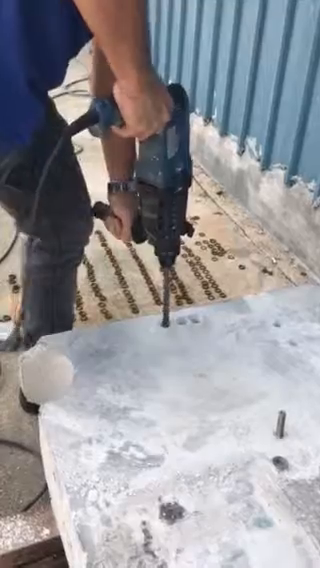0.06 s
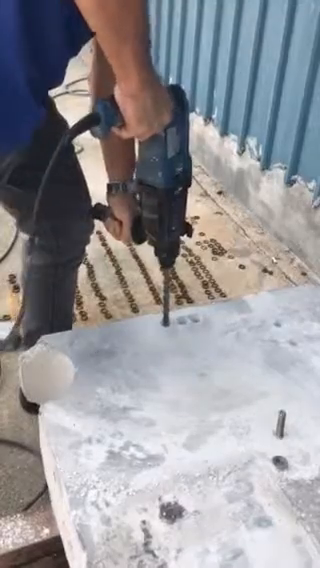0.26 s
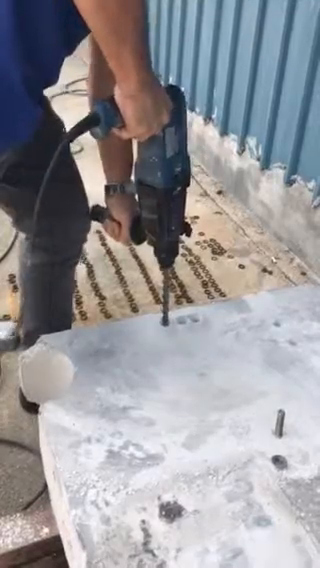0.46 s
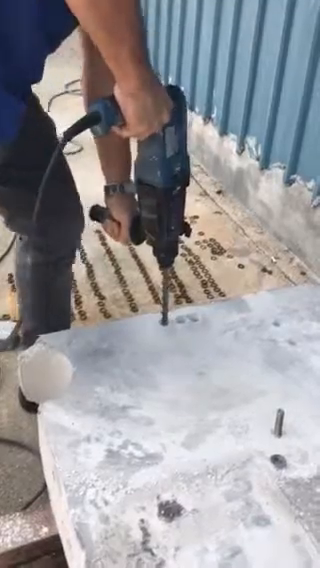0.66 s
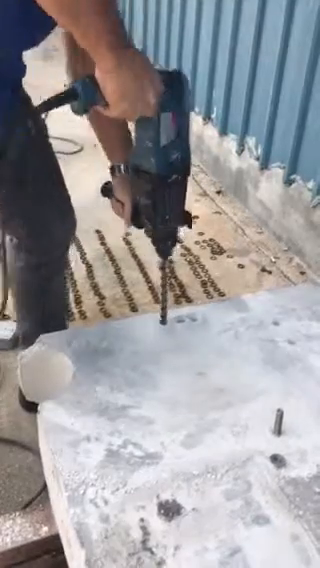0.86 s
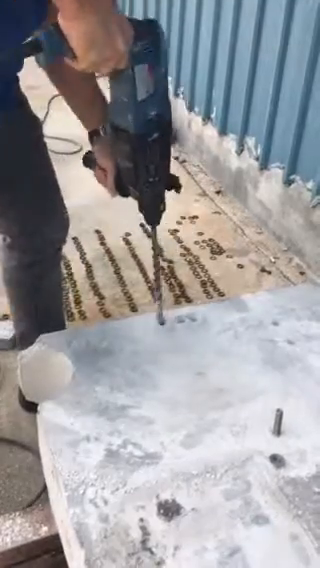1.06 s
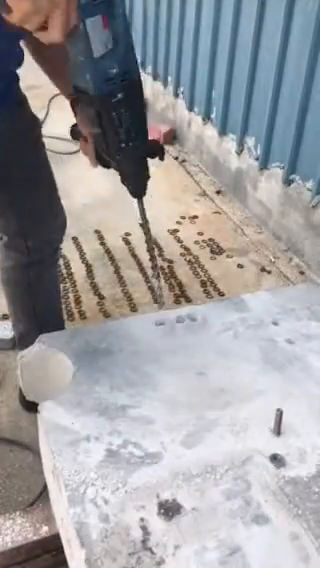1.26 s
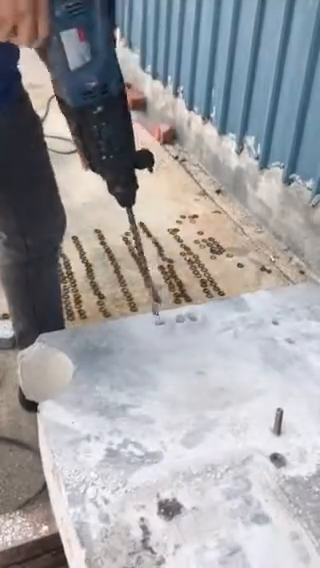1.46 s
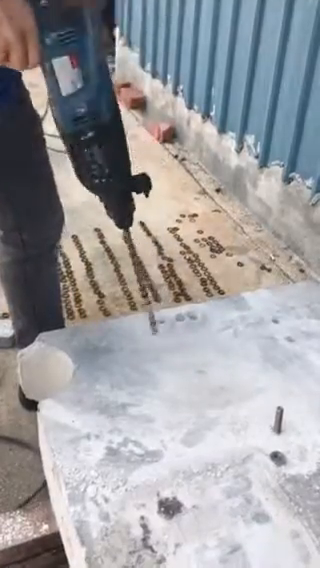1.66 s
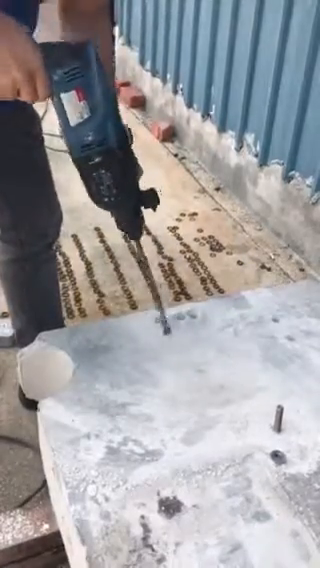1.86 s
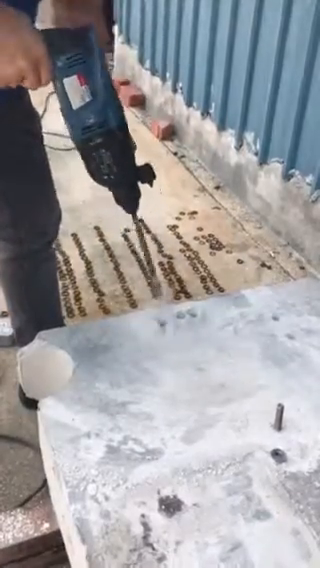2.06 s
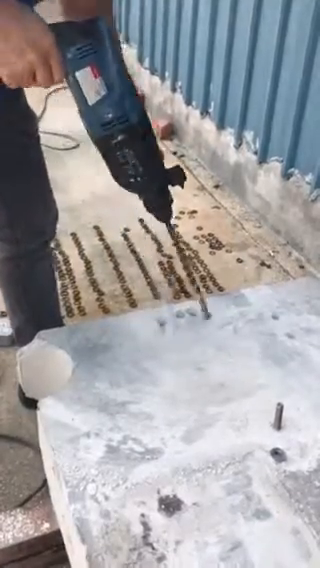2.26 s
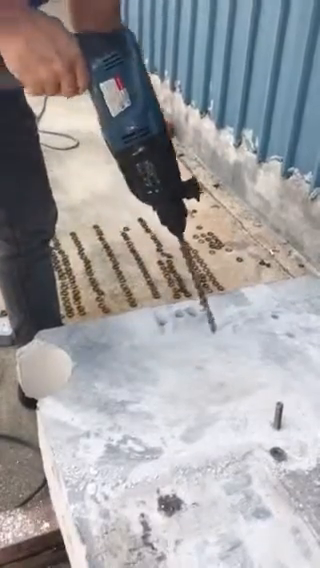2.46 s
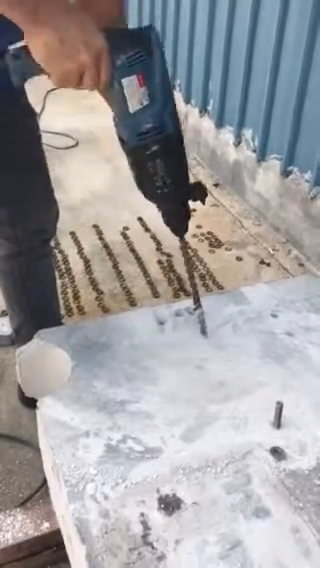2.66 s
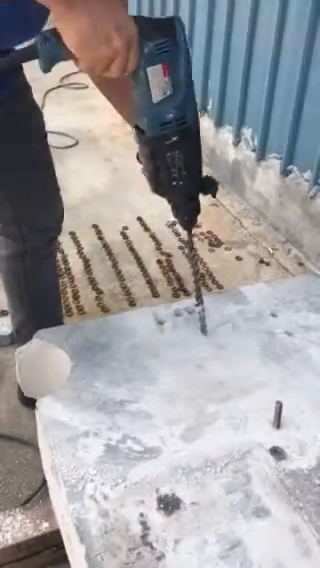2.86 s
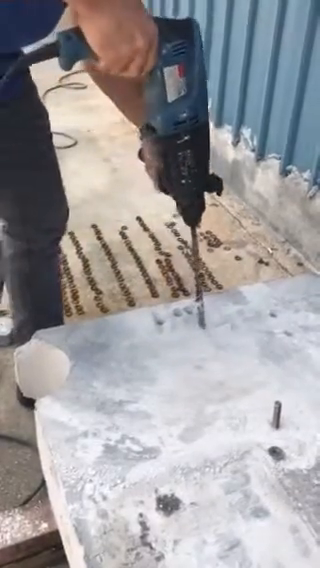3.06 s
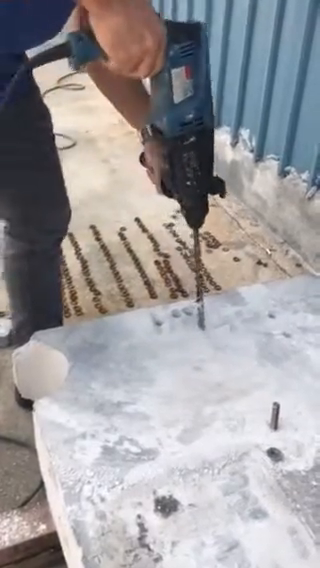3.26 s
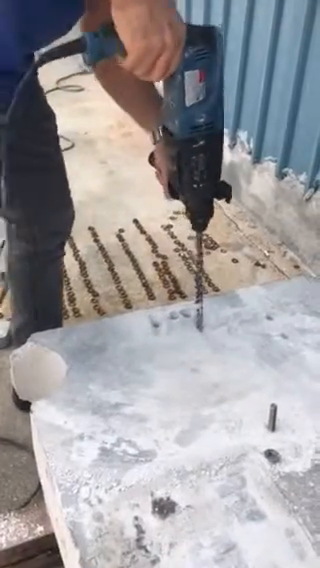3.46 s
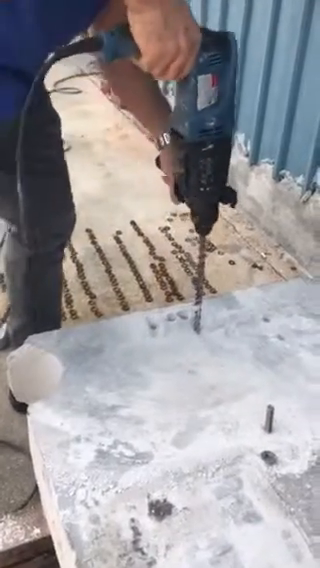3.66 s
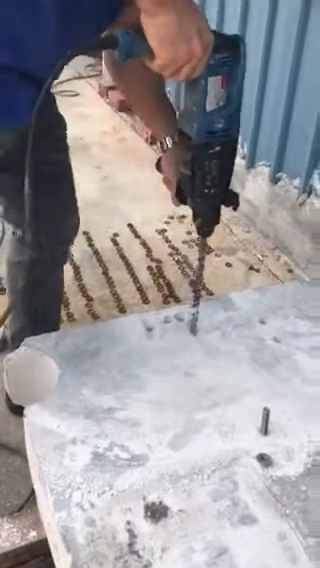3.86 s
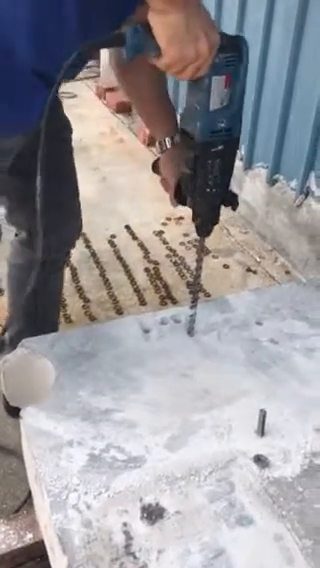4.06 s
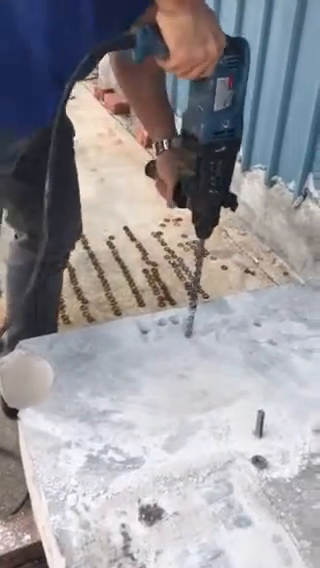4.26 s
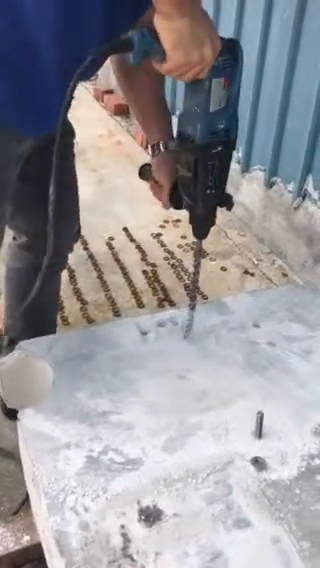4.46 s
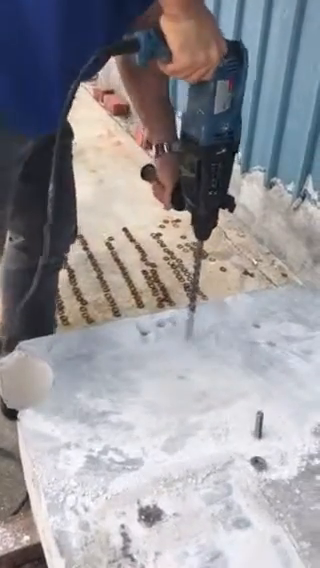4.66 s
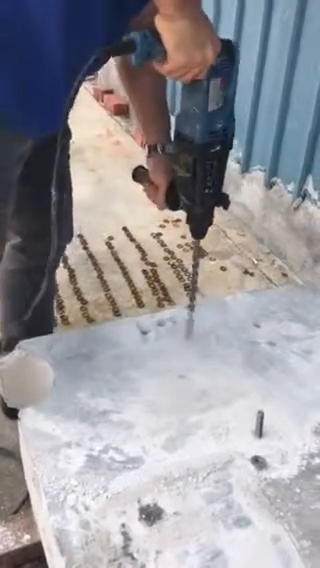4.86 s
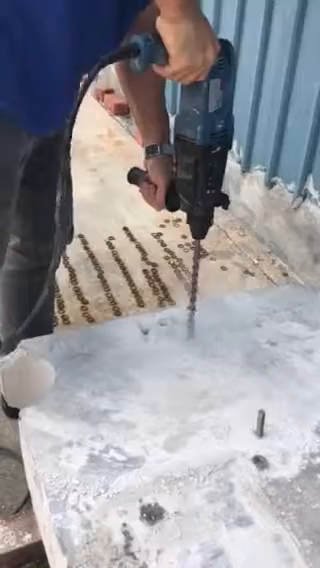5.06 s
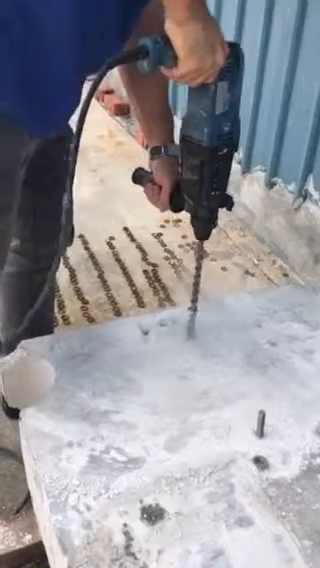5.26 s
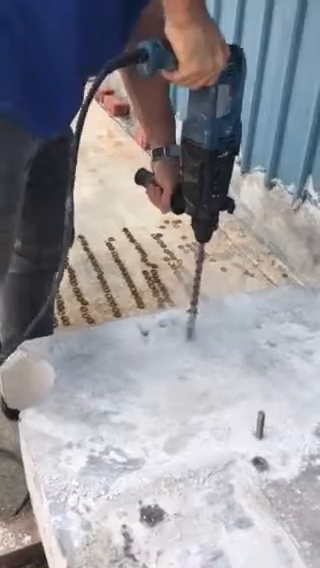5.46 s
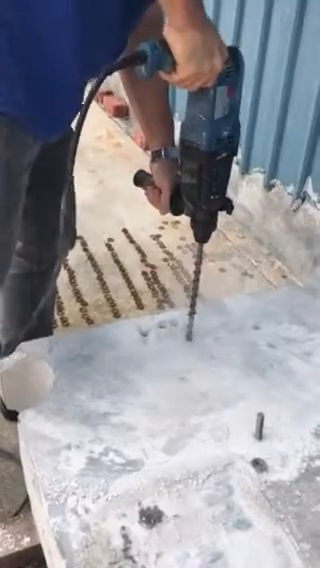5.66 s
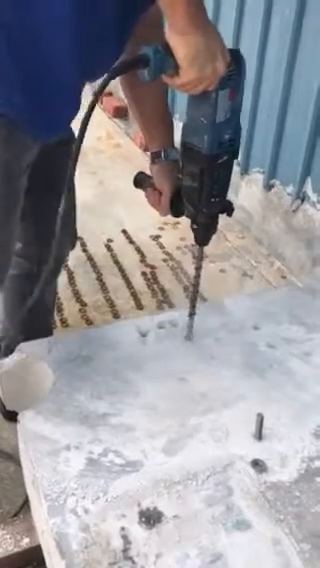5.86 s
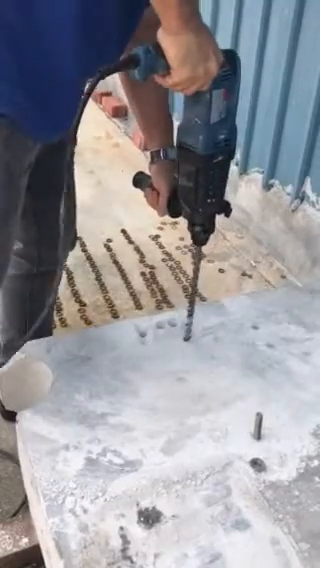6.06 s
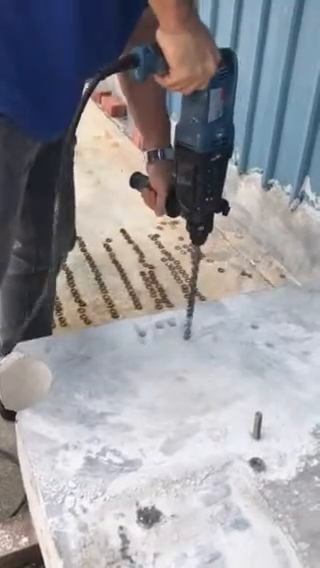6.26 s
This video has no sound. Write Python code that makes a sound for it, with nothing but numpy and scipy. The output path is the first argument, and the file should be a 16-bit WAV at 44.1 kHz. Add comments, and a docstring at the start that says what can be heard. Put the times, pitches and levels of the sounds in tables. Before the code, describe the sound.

A nearby microphone in an open yard catches dense machine-gun-like blows of a steel bit in concrete, with gritty cracking and a low housing drone. The blows cease, freed gears rush and fall in pitch, two sharp taps ring, and final dry clacks spread apart. Small plastic clicks dot the near silence before a double trigger click and a second, grinding, sustained spell of hammering with low jolts.

```python
"""A rapid hammering of steel on concrete, about 65 blows a second: a corded hammer drill, close by outdoors.
Each blow is a noise crack with decaying modes of bit, chuck and housing; gears are filtered noise and
tones tied to the crank angle. Lifted out, the motor races, is switched off and coasts down with slowing
clacks. The bit is set on a new spot, the trigger clicks and the hammering starts again."""
import sys
import numpy as np
from scipy import signal
from scipy.fft import rfft, irfft, next_fast_len
from scipy.io import wavfile
from scipy.ndimage import map_coordinates

SR = 44100
rng = np.random.default_rng(int(sys.argv[2]) if len(sys.argv) > 2 else 0)


def inscribe(sig):
    """Save sig as 16-bit PCM at rate SR to the path in sys.argv[1].

    A 1-D sig is mono; a 2-D sig holds one channel per row.
    Samples are clipped to [-1, 1] before scaling.
    """
    pcm = np.round(np.clip(np.atleast_2d(sig).T, -1, 1) * 32767)
    wavfile.write(sys.argv[1], SR, pcm.astype(np.int16))


N = 278271
TIME = np.arange(N) / SR
BRIEF = TIME[:SR // 6]  # time axis of one hit, which ends after 1/6 s at the latest
TOP_HZ = 15950  # upper band limit


def amp(db):
    """Decibels to amplitude gain, 20 dB per factor of ten."""
    return 10 ** (np.asarray(db) / 20)


def unit(x):
    """Energy normalisation: x scaled to rms 1."""
    return x / np.sqrt(np.mean(x ** 2) + 1e-20)


def along(points, hz):
    """Logarithmic pitch: (Hz, value) points interpolated on a log frequency axis."""
    f, v = np.transpose(points)
    return np.interp(np.log(hz + 1), np.log(f + 1), v)


def curves(rows):
    """Linear interpolation: one value per sample for each column after the time."""
    s, *cols = np.transpose(rows)
    return [np.interp(TIME, s, c) for c in cols]


def wobble(rate):
    """Band-limited chance: a smooth random curve with rate knots a second."""
    knots = rng.standard_normal(int(N * rate / SR) + 4)
    return map_coordinates(knots, [TIME * rate], order=2)


def swell(at, width):
    """Gaussian envelope: a smooth bump of height 1 around a moment."""
    return np.exp(-((TIME - at) / width) ** 2)


def speed_db(ratio, db_per_decade):
    """Power law: level change of a sound that grows with speed."""
    return db_per_decade * np.log10(np.maximum(ratio, 1e-6))


def filtered(x, response):
    """Linear filtering: the spectrum of x times a response of frequency."""
    m = next_fast_len(N + SR // 4)
    return irfft(rfft(x, m) * response(np.fft.rfftfreq(m, 1 / SR)), m)[:N]


def noise(spectrum):
    """Spectral shaping: white noise coloured by (Hz, dB) points, at rms 1."""
    return unit(filtered(rng.standard_normal(N), lambda hz: amp(along(spectrum, hz))))


def resonant_noise(resonances):
    """Resonance: noise of rms 1 passed through parallel (Hz, width Hz, dB) peaks."""
    def response(f):
        return sum(amp(db) / (1 + (2 * (f - hz) / width) ** 2) for hz, width, db in resonances)
    return unit(filtered(rng.standard_normal(N), response))


def decay(t60, attack):
    """Exponential damping after a quick rise: the envelope of one short hit, times in s."""
    return amp(-60 * BRIEF / t60) * (1 - np.exp(-BRIEF / attack))


def train(times, sizes, shape):
    """Superposition: a scaled copy of shape at each time."""
    at = np.clip(np.round(times * SR).astype(int), 0, N)
    return signal.oaconvolve(np.bincount(at, sizes, N + 1)[:N], shape)[:N]


# background spectrum of the open air: pitch_hz [Hz], level_db [relative dB per Hz]
OPEN_AIR = [(15, -35), (25, -7), (108, -2.5), (317, -5), (416, -15.5), (607, -11), (818, -17.5),
            (1070, -12), (1330, -18.5), (3160, -21), (5000, -29), (7110, -31.5), (10400, -42), (14400, -41),
            (16000, -56)]
AIR_DB, AIR_WAVER_DB = -54.5, 1.8
RUMBLE_DB, RUMBLE_SWELL_DB, RUMBLE_S, RUMBLE_WIDTH_S = -63.5, 13, 3, 1.1


def outdoors():
    """Broadband ambience: wavering air noise, and a low rumble that swells while the tool is moved."""
    air = amp(AIR_DB + AIR_WAVER_DB * wobble(7.5)) * noise(OPEN_AIR)
    rumble_db = RUMBLE_DB + RUMBLE_SWELL_DB * swell(RUMBLE_S, RUMBLE_WIDTH_S)
    return air + amp(rumble_db) * noise([(20, -6), (40, 1.5), (100, 5), (140, -18.0), (400, -48)])


# crank speed that the pressure on the tool allows in the first hole: start_s [s], speed [turns/s]
PRESSED_FIRST = [(0, 63.92), (.7, 61.88), (.85, 63.06)]
# lifted: moment (s), time scale (s) and free speed (turns/s)
LIFT_S, RACE_S, FREE_SPEED = .92, .0707, 79.16
# coasting: standstill (s), time scale (s), and speed at which fan drag equals friction (turns/s)
STOP_S, COAST_S, DRAG_SPEED = 2.8101, 1.4933, 47.92


def first_speed():
    """Torque balance: held back by concrete, racing once lifted, then braked by fan drag and friction."""
    pressed = curves(PRESSED_FIRST)[0]
    powered = FREE_SPEED + (pressed - FREE_SPEED) * np.exp(-np.maximum(TIME - LIFT_S, 0) / RACE_S)
    # quadratic drag plus constant friction slows the crank along a tangent curve
    coasting = DRAG_SPEED * np.tan(np.clip((STOP_S - TIME) / COAST_S, 0, 1.5))
    return np.minimum(powered, coasting)


def crank(speed, first_blow):
    """Phase is integrated speed: crank angle in turns, and the times the striker flies forward."""
    turns = np.cumsum(speed) / SR
    turns -= np.interp(first_blow, TIME, turns)
    return turns, np.interp(np.arange(int(turns[-1]) + 1), turns, TIME)


# hammering in each hole: start_s [s, first blow], end_s [s]
SPELLS = [(.0067, .925), (4.3676, 6.32)]
# relative levels in each hole, easing as the bit sinks:
# blow_db [dB], blow_fall [dB/s], shake_db [dB], drone_db [dB], drone_fall [dB/s]
HOLES = [(-24.5, 0.3, -25.5, -23.5, 10), (-21, 1.76, -35.5, -30.5, 2.2)]
# the tool bucks as the bit bites into fresh concrete
BUCK_S, BUCK_WIDTH_S, BUCK_SHAKE_DB, BUCK_GRIND_DB = 4.52, .06, 9.5, 2.5


def load(hole):
    """Loading with depth: levels in dB of blow, housing shake and housing drone while the bit sinks."""
    blow_db, blow_fall, shake_db, drone_db, drone_fall = HOLES[hole]
    sunk = np.clip(TIME, *SPELLS[hole]) - SPELLS[hole][0]
    shake_db = shake_db + BUCK_SHAKE_DB * swell(BUCK_S, BUCK_WIDTH_S)
    return blow_db - blow_fall * sunk, shake_db, drone_db - drone_fall * sunk


def ring(modes, times, sizes, hole, scatter_db, attack):
    """Modal vibration: damped steel modes, struck at a new strength and sign by every blow."""
    out = np.zeros(N)
    for hz, t60, *levels in modes:
        strength = amp(levels[hole] + scatter_db * rng.standard_normal(len(times)))
        strength *= rng.choice([-1, 1], len(times))
        out += train(times, sizes * strength, decay(t60, attack) * np.sin(2 * np.pi * hz * BRIEF))
    return out


# resonances of housing and slab: pitch_hz [Hz], width_hz [Hz], level_db [relative dB]
BODY_MODES = [(798, 90, -23), (1012.4, 86, 6), (1075, 36, 3), (1180, 12, -0.5), (1448, 61, 0.5),
              (1517, 33, -5.5), (1801, 35, 3.5), (2424, 180, -7.5)]
# ringing of the steel bit: pitch_hz [Hz], t60_s [s], first_hole_db, second_hole_db [relative dB]
BIT_MODES = [(4274, 0.039, -12.5, -12), (5785, 0.014, 0, -1.5), (6070, 0.013, -7, 0),
             (8150, .018, -6, -0.5), (8400, 0.011, -7, 4), (8770, 0.043, -16.5, -11),
             (9500, 0.024, -14, -12)]
# ringing of the chuck: pitch_hz [Hz], t60_s [s], first_hole_db, second_hole_db [relative dB]
CHUCK_MODES = [(11900, .012, -11.5, -9.5), (13050, .012, -3.5, -5), (15260, .014, -18, -11),
               (15630, .018, -6, -4.5)]
# noise of cracking concrete: pitch_hz [Hz], level_db [relative dB per Hz]
CRACK_SPECTRUM = [(300, -28), (900, -19), (2000, -8), (4000, 2.5), (7000, 4), (9500, 2.5), (11000, -2),
                  (16000, 3)]
# noise of grit as the bit springs back: pitch_hz [Hz], level_db [relative dB per Hz]
GRIT_SPECTRUM = [(1000, -13), (3000, 1.5), (7000, -7.5), (10500, -5.5), (13000, 6), (14300, -4), (16000, 0)]


def hammer(times, hole, crack_db, bit_db, chuck_db, grit_db, body_db, rebound):
    """Impact and rebound: a blow cracks concrete, rings bit and housing; the bit springs into the chuck."""
    times = times[times < SPELLS[hole][1]]
    chance = rng.standard_normal((len(times), 4)).T
    sizes = amp(np.interp(times, TIME, load(hole)[0]) + 1.3 * chance[0])
    crack = train(times, sizes, decay(t60=0.02, attack=0.00076)) * noise(CRACK_SPECTRUM)
    bit = ring(BIT_MODES, times, sizes, hole, scatter_db=3.5, attack=0.00059)

    back = times + rebound + 0.0011 * chance[1]
    back_sizes = sizes * amp(2.0 * chance[2])
    both_times, both_sizes = np.r_[times, back], np.r_[.6 * sizes, back_sizes]
    chuck = ring(CHUCK_MODES, both_times, both_sizes, hole, scatter_db=6.0, attack=0.00054)
    grit = train(back, back_sizes, decay(t60=0.012, attack=0.00051)) * noise(GRIT_SPECTRUM)

    # the housing answers every blow alike, so its ringing forms harmonics of the blow rate
    knock = np.zeros(len(BRIEF))
    for hz, width, db in BODY_MODES:
        knock += amp(db) * width * np.exp(-np.pi * width * BRIEF) * np.sin(2 * np.pi * hz * BRIEF)
    knock *= 1 - np.exp(-BRIEF / 0.0031)  # the heavy housing takes a moment to swing up
    body = train(times + .00002 * chance[3], sizes, knock / np.abs(knock).max())

    steel = amp(bit_db) * bit + amp(chuck_db) * chuck
    return amp(crack_db) * crack + steel + amp(grit_db) * grit + amp(body_db) * body


# scattering in the yard: pitch_hz [Hz], t60_s [s]
YARD_DECAY = [(200, 0.11), (2000, 0.098), (8000, 0.12), (12000, 0.084)]


def yard(x):
    """Diffuse reflection: a short scattered answer from the ground and the sheet-metal fence."""
    _, t, grains = signal.stft(rng.standard_normal(SR // 3), SR, nperseg=256)
    hz = np.fft.rfftfreq(256, 1 / SR)
    fading = amp(-60 * t / along(YARD_DECAY, hz)[:, None])
    tail = signal.istft(grains * fading, SR, nperseg=256)[1]
    delayed = np.pad(x, (SR // 200, 0))  # 5 ms
    return signal.fftconvolve(delayed, tail / np.linalg.norm(tail))[:N]


RELEASE_S = .035  # the housing rings on as the pressure comes off


def during(start, end, rise):
    """Gating: 1 between two moments, rising just before and dying away after."""
    return np.clip(1 + (TIME - start) / rise, 0, 1) * np.exp(-np.maximum(TIME - end, 0) / RELEASE_S)


# low response of the housing to the blows, in the first and second hole: pitch_hz [Hz], level_db [relative dB]
SHAKE_FIRST = [(63, -14), (125, -21.5), (180, 5), (195, -5), (250, -26), (315, -8.5), (380, -31),
               (480, -43)]
SHAKE_SECOND = [(35, -30), (65, -5.5), (130, -6.5), (180, 8), (200, -2.5), (265, -8.5), (330, -14),
                (400, -12.5), (480, -29)]
# droning response of the housing: pitch_hz [Hz], level_db [relative dB]
DRONE_RESPONSE = [(480, -35), (560, -20), (582, -0.5), (632, 1), (665, -13), (740, -64.5)]


def hum(turns, speed, hole):
    """Forced vibration: each multiple of the blow rate sounds as the housing answers at its pitch."""
    shake = (SHAKE_FIRST, SHAKE_SECOND)[hole]
    _, shake_db, drone_db = load(hole)
    on = during(*SPELLS[hole], rise=0.037)
    live = on > 0
    out = np.zeros(N)
    for k in np.arange(1, 13):
        hz = k * speed[live]
        gain = amp(shake_db[live] + along(shake, hz)) + amp(drone_db[live] + along(DRONE_RESPONSE, hz))
        gain *= amp(1.8 * wobble(22)[live])
        phase = 2 * np.pi * (k * turns[live] + rng.random()) + .2 * wobble(25)[live]
        out[live] += gain * np.sin(phase)
    return np.sqrt(2) * on * out


# grinding of the loaded gears in the first hole: pitch_hz [Hz], level_db [relative dB per Hz]
LOADED_FIRST = [(100, -13.5), (420, -7.5), (700, -0.5), (1000, 2), (1900, -2), (2400, 1.5), (3000, -3),
                (4400, -6.5), (7000, -13.5), (9500, -11.5), (11000, -18.5), (15500, -17.5)]
GRIND_FIRST_DB = -23


def lifting():
    """Crossfade from loaded to free gears: rises from 0 to 1 as the bit is lifted."""
    return np.clip((TIME - LIFT_S) / 0.028, 0, 1)


def first_grind():
    """Friction noise: the gears grind under load until the bit is lifted."""
    return (1 - lifting()) * amp(GRIND_FIRST_DB) * noise(LOADED_FIRST)


# hard catches of the bit that jolt the slab: start_s [s], level_db, knock_db [relative dB]
JOLTS = [(0.099, -18.5, -18), (0.384, -19.5, -19), (4.511, -17, -45), (4.934, -20, -24.5),
         (5.081, -21.5, -19.5), (5.215, -21.5, -19), (5.366, -23.5, -22.5), (6.183, -18.5, -14.5)]


def jolts(rows):
    """Transient excitation: a catch of the bit gives one low push, a soft knock and a short rumble."""
    times, db, knock_db = np.transpose(rows)
    push_shape = decay(t60=0.057, attack=0.0022) * np.sin(2 * np.pi * 74 * BRIEF)
    push = train(times + 0.0048, amp(db), push_shape)
    rumble = train(times, amp(db), decay(t60=0.2, attack=0.0039))
    rumble *= noise([(20, -19.0), (50, -1.5), (130, 0.0), (260, -10), (600, -49.0), (2000, -78)])
    knock_shape = decay(t60=0.0099, attack=0.0011) * np.sin(2 * np.pi * 290 * BRIEF)
    knock = train(times + 0.0031, amp(knock_db), knock_shape)
    return amp(9.5) * push + amp(1.5) * rumble + amp(17.5) * knock


CRANK_PER_BIT_TURN = 9.1  # crank turns in one turn of the bit
SNAG_DB, SNAG_KNOCK_DB, SNAG_SCATTER_DB = -27.5, -34, 2.5  # relative, as in JOLTS


def snags(turns, hole, first_turn):
    """Periodic catching: rows like JOLTS, a light snag on each turn of the bit that has no hard catch."""
    last_turn = np.interp(SPELLS[hole][1], TIME, turns)
    times = np.interp(np.arange(first_turn, last_turn, CRANK_PER_BIT_TURN), turns, TIME)
    chance_db = SNAG_SCATTER_DB * rng.standard_normal(len(times))
    hard = np.transpose(JOLTS)[0]
    rows = []
    for s, db in zip(times, chance_db):
        if np.abs(hard - s).min() > .06:
            rows.append((s, SNAG_DB + db, SNAG_KNOCK_DB + db))
    return rows


def chatter():
    """Repeated random impact: as the pressure comes off, the loose bit chatters in the chuck."""
    times = np.sort(rng.uniform(.866, .918, size=14))
    sizes = np.ones(len(times))
    chuck = ring(CHUCK_MODES, times, sizes, 0, scatter_db=4.0, attack=.002)
    bit = ring(BIT_MODES, times, sizes, 0, scatter_db=5.5, attack=.002)
    rasp = train(times, sizes, decay(t60=0.0085, attack=.0005)) * noise(LOADED_FIRST)
    return amp(-6.5) * chuck + amp(-17.5) * bit + amp(-20) * rasp


# fan and gear whine: multiple [of the crank speed], level_db [relative dB]
WHINE_TONES = [(7.3, 3.5), (8.2, -2.5), (13, -10.5), (19.2, -0.5), (34.3, -6.5), (38.5, -6.5), (49, -8),
               (68.5, -8), (102.5, -5.5), (112, -8), (137, -15), (172, -12.5), (205, -13.5), (238, -6),
               (345, -17), (366, -17)]
# how well the housing radiates the whine: pitch_hz [Hz], level_db [relative dB]
RADIATION_RESPONSE = [(300, -35), (450, -24), (580, -9.5), (750, -9.5), (1000, -7), (2500, -3), (4500, -4),
                      (7000, -11), (9500, 1), (11000, -2), (14000, 13), (16000, -12.5)]
WHINE_WAVER_DB = 1.2


def whine(turns, blur, slop):
    """Order tones: fan and gear pitches follow the crank; backlash widens each by shares of pitch and speed."""
    angle = np.maximum(turns - turns[0], 0)
    speed = np.gradient(turns) * SR
    tones = np.zeros(N)
    for k, db in WHINE_TONES:
        place = (k * blur + slop) * angle
        knots = rng.standard_normal((int(place.max()) + 2, 2)) @ [1, 1j]
        flutter = np.interp(place, np.arange(len(knots)), knots)
        # at full speed the high tones drown in rush
        masked = np.clip(k * speed / 5000 - 1, 0, 1) * np.clip(speed / 25 - 1.7, 0, 1)
        # each tone swells and fades as the loose gears shift
        gain = amp(db - 16 * masked + WHINE_WAVER_DB * wobble(16)) * (k * speed < TOP_HZ)
        tones += gain * np.real(flutter * np.exp(2j * np.pi * k * turns))
    return filtered(tones, lambda hz: amp(along(RADIATION_RESPONSE, hz)) * (hz > 100))


# noise of the racing and of the coasting gears: pitch_hz [Hz], level_db [relative dB per Hz]
RACING_SPECTRUM = [(88, -60), (150, -22.5), (414, -10.5), (601, 2), (716, -8.5), (941, 5.5), (1420, 2.5),
                   (1690, 0.5), (2020, 5), (3550, 0), (4580, 1), (7620, -6), (9260, -4), (13400, -7.5),
                   (16000, -8)]
COASTING_SPECTRUM = [(88, -49), (150, -25), (368, -10.5), (406, -18), (612, -0.5), (716, -9), (979, 1.5),
                     (1210, 0), (2400, -1.5), (4860, -11.5), (5570, -15), (6910, -11.5), (8230, -20),
                     (14000, -25.5), (16000, -35)]
# resonances of the gearbox, rubbed by the coasting gears: pitch_hz [Hz], width_hz [Hz], level_db [relative dB]
GEARBOX_MODES = [(1060, 170, -11), (2420, 520, 6), (4100, 430, -2), (9400, 480, -4), (14630, 900, -22)]
# relative levels at the free speed, and growth with speed; the whine outlasts the gear noise
RACE_DB, COAST_DB_PER_DECADE = -22, 19.5
WHINE_DB, WHINE_DB_PER_DECADE = -26, 16
# the chuck sleeve, rung by the rattle, most at the height of the race
SLEEVE_HZ, SLEEVE_WIDTH_HZ, SLEEVE_DB = 4900, 900, -6
SLEEVE_S, SLEEVE_SWELL_S = 1.2, 0.12


def free_motor(turns, times, speed):
    """Speed-dependent radiation: freed gears race, then coast to rest under a rattling striker."""
    slow = np.clip((TIME - 1.5) / 1.2, 0, 1)
    rub = np.clip((STOP_S - TIME) / .25, 0, 1) * resonant_noise(GEARBOX_MODES)
    coasting = amp(1.0) * noise(COASTING_SPECTRUM) + rub
    idle = amp(1) * np.sqrt(1 - slow) * noise(RACING_SPECTRUM) + np.sqrt(slow) * coasting
    sleeve = resonant_noise([(SLEEVE_HZ, SLEEVE_WIDTH_HZ, 0)])
    idle += amp(SLEEVE_DB) * swell(SLEEVE_S, SLEEVE_SWELL_S) * sleeve

    # the loose striker rattles once a turn
    rattle_sizes = amp(0.75 * rng.standard_normal(len(times)))
    rattle = train(times + 0.002, rattle_sizes, decay(t60=0.025, attack=0.0011))
    idle *= (0.68 + 1.74 * (1 - slow) * rattle) * amp(1.7 * wobble(400))

    # the unbalanced crank throbs while it runs free
    throb = (1 - slow) * sum(np.sin(2 * np.pi * k * turns + wobble(25)) for k in range(1, 4))
    ratio = speed / FREE_SPEED
    gears = amp(RACE_DB + speed_db(ratio, COAST_DB_PER_DECADE)) * (idle + amp(-34.5) * throb)
    tones = amp(WHINE_DB + speed_db(ratio, WHINE_DB_PER_DECADE)) * whine(turns, blur=.06, slop=.25)
    return lifting() * (gears + tones)


# dry knock, thud and tick of the housing: pitch_hz [Hz], level_db [relative dB per Hz]
KNOCK_SPECTRUM = [(400, -21.5), (1000, -14.5), (1400, -2), (2000, 1), (2400, -1.5), (2900, -9.5),
                  (4200, -7), (6000, -22.5), (16000, -45.5)]
THUD_SPECTRUM = [(200, -30), (450, -26), (600, -4), (800, -0.5), (1060, 8.5), (1280, -16), (1800, -16),
                 (5000, -64)]
TICK_SPECTRUM = [(2000, -38), (5500, 0), (7500, -5.5), (9500, 0), (11000, -9.5), (16000, -3.5)]


def knocks(times, db, thud_db, treble_db, t60):
    """Damped impact noise: short dry knocks in the housing, with a share of thud and treble."""
    knock = train(times, amp(db), decay(t60, attack=0.0014)) * noise(KNOCK_SPECTRUM)
    thud = train(times, amp(db + thud_db), decay(t60, attack=0.0019)) * noise(THUD_SPECTRUM)
    tick = train(times, amp(db + treble_db), decay(t60, attack=0.00027)) * noise(TICK_SPECTRUM)
    return knock + thud + tick


# last clacks, heard one by one: start_s [s], level_db [relative dB]
LAST_CLACKS = [(2.292, -19), (2.353, -17.5), (2.42, -20.5), (2.503, -20.5), (2.613, -19.5)]
# clacking starts below this crank speed (turns/s), softer as it slows
CLACK_SPEED, CLACK_DB, CLACK_DB_PER_DECADE = 41, -14.5, 22


def clacks(times, speed):
    """Slowing impact rate: the idle striker clacks once a turn, at last in single knocks."""
    last_times, last_db = np.transpose(LAST_CLACKS)
    ratio = np.interp(times, TIME, speed) / CLACK_SPEED
    db = CLACK_DB + speed_db(ratio, CLACK_DB_PER_DECADE)
    slow = (ratio < 1) & (times < last_times[0] - .04)
    all_times = np.r_[times[slow] + .002, last_times]
    all_db = np.r_[db[slow], last_db]
    return amp(-1.5) * knocks(all_times, all_db, thud_db=-6.5, treble_db=-7.0, t60=.029)


# the bit touches the slab: start_s [s], level_db, housing_db, scrape_db [relative dB]
TOUCHES = [(1.970, -16, -44, -48), (2.003, -10, -50, -44), (3.676, -36, -38, -45)]


def touches():
    """Light contact: the bit taps the slab, rings and scrapes a little, and the whole tool rocks on it."""
    times, db, housing_db, scrape_db = np.transpose(TOUCHES)
    tap = ring(BIT_MODES, times, amp(db + 2), 0, scatter_db=1.5, attack=.001)
    chip = train(times, amp(db - 7.5), decay(t60=0.038, attack=.001)) * noise(TICK_SPECTRUM)
    knock = train(times, amp(db - 11), decay(t60=0.05, attack=.001)) * noise(RACING_SPECTRUM)
    scrape = train(times, amp(scrape_db), decay(t60=0.49, attack=0.004)) * noise(COASTING_SPECTRUM)
    rock_shape = decay(t60=0.34, attack=0.00594) * np.sin(2 * np.pi * 178 * BRIEF)
    rock = train(times, amp(housing_db), rock_shape)
    return tap + chip + knock + scrape + rock


GROAN_S, GROAN_WIDTH_S, GROAN_DB = 2.62, 0.1, -50


def groan():
    """Narrow-band friction: the gears groan low through their last turns before they stand still."""
    rub = noise([(180, -40), (280, 3), (330, -3), (370, 0.0), (520, -46)])
    return amp(GROAN_DB) * swell(GROAN_S, GROAN_WIDTH_S) * rub


# clicks of grip and trigger: start_s [s], level_db, thud_db, treble_db [relative dB]
CLICKS = [(3.169, -52, -16, -10), (3.272, -34.5, -12, -25), (3.478, -26, -3.5, -24.5),
          (3.764, -31.5, -18, -23), (4.092, -49, -15, -17), (4.252, -26.5, -24, -21.5),
          (4.279, -22.5, -24, -41)]


def clicks():
    """Small impacts on a shell: the hand shifts on the grip and pulls the trigger."""
    times, db, thud_db, treble_db = np.transpose(CLICKS)
    return amp(-4.0) * knocks(times, db, thud_db + 12.0, treble_db + 11.5, t60=0.036)


# crank speed that the pressure on the tool allows in the second hole: start_s [s], speed [turns/s]
PRESSED_SECOND = [(4.8, 66.83), (5.3, 66.16), (6.08, 64.12), (6.31, 66.34)]
RESTART_S, SPIN_UP_S = 4.301, .124  # switch-on and time scale of the spin-up


def second_speed():
    """Saturating acceleration: the crank spins up from rest to the speed that the pressure allows."""
    return curves(PRESSED_SECOND)[0] * np.tanh(np.maximum(TIME - RESTART_S, 0) / SPIN_UP_S)


# grinding of the loaded gears in the second hole: pitch_hz [Hz], level_db [relative dB per Hz]
LOADED_SECOND = [(100, -5), (420, -11), (700, -4), (1000, 1), (1500, 1.5), (2000, 0.5), (2600, -4.5),
                 (4400, -7), (7000, -14.5), (9000, -7.5), (11000, -20.5), (15500, -19)]
GRIND_SECOND_DB, SPIN_UP_DB_PER_DECADE = -25, 27.5  # relative level, and growth with speed
BITE_DB, BITE_FADE_S = 9.5, 0.45  # extra grinding in a fresh hole


def second_motor(turns, speed):
    """Friction under load: the motor spins up against the slab and grinds hardest in the fresh hole."""
    gears = noise(LOADED_SECOND) * amp(0.82 * wobble(400))
    gears += amp(-19) * whine(turns, blur=.015, slop=.4)
    bite_db = BITE_DB * np.exp(-np.maximum(TIME - RESTART_S, 0) / BITE_FADE_S)
    bite_db += BUCK_GRIND_DB * swell(BUCK_S, BUCK_WIDTH_S)
    spin_db = speed_db(speed / speed.max(), SPIN_UP_DB_PER_DECADE)
    return amp(GRIND_SECOND_DB + bite_db + spin_db) * gears


def scene():
    """Superposed sources: two spells of drilling, the handling between them and the quiet yard."""
    first, second = range(2)
    speed_a, speed_b = first_speed(), second_speed()
    turns_a, times_a = crank(speed_a, SPELLS[first][0])
    turns_b, times_b = crank(speed_b, SPELLS[second][0])

    drill = hammer(times_a, first, crack_db=11.5, bit_db=5, chuck_db=5.5, grit_db=12, body_db=8.5,
                   rebound=.0033)
    drill += first_grind() + chatter() + free_motor(turns_a, times_a, speed_a)
    drill += clacks(times_a, speed_a) + touches() + groan() + clicks()
    drill += hammer(times_b, second, crack_db=11, bit_db=7.0, chuck_db=1.0, grit_db=10.5, body_db=5,
                    rebound=0.0047)
    drill += second_motor(turns_b, speed_b)

    low = hum(turns_a, speed_a, first) + hum(turns_b, speed_b, second)
    low += jolts(JOLTS + snags(turns_a, first, first_turn=5.1) + snags(turns_b, second, first_turn=8))
    return (drill + amp(-12.5) * yard(drill) + low + outdoors())[None]


def record(dry):
    """Transducer limits: the microphone drops the deepest bass, rounds tall peaks and has a band limit."""
    x = filtered(dry[0], lambda hz: hz ** 4 / (hz ** 4 + 31 ** 4))
    x = x / (1 + np.abs(x / .85) ** 6) ** (1 / 6)
    return filtered(x, lambda hz: 1 / (1 + (hz / TOP_HZ) ** 300))[None]


dry = scene()
out = record(dry)
inscribe(out)
```